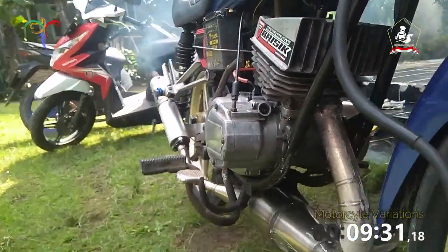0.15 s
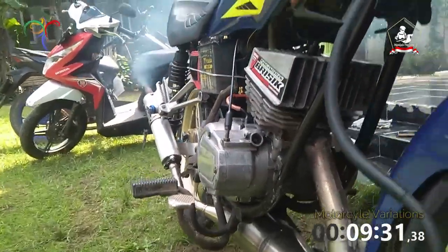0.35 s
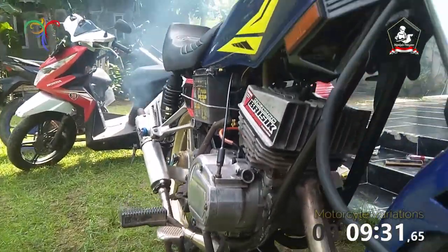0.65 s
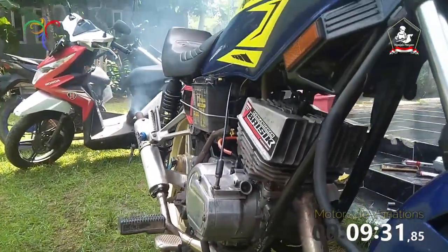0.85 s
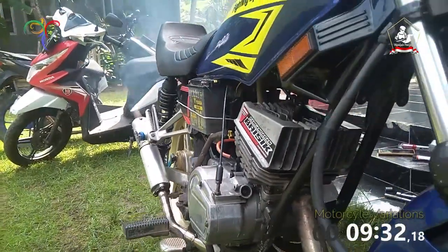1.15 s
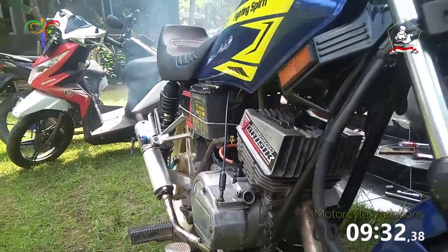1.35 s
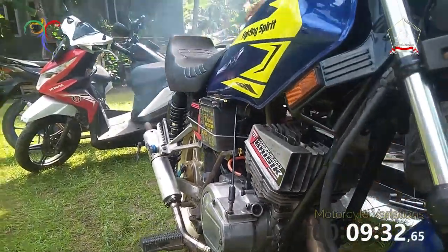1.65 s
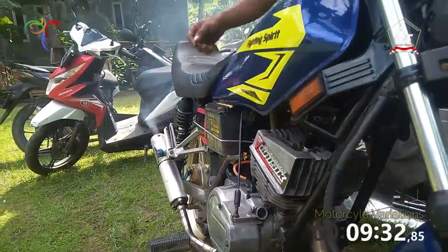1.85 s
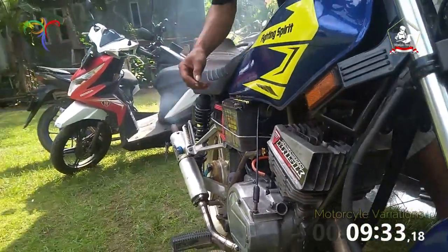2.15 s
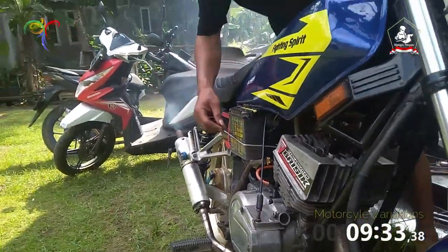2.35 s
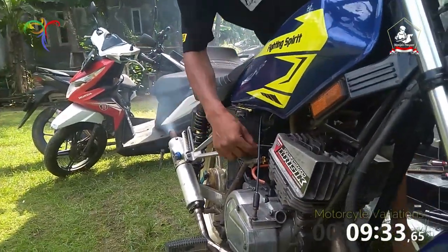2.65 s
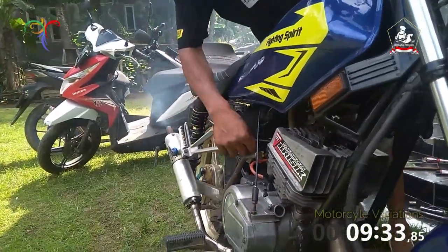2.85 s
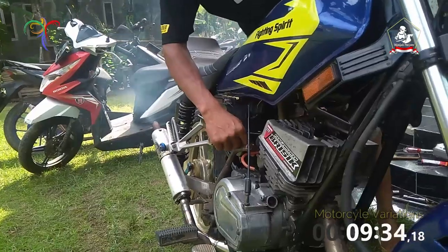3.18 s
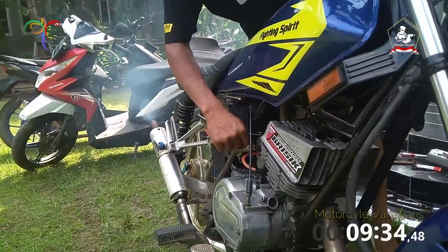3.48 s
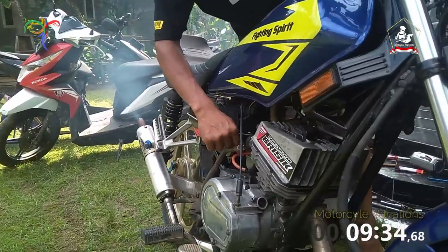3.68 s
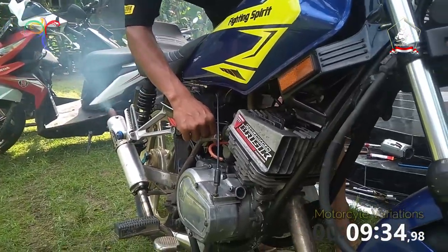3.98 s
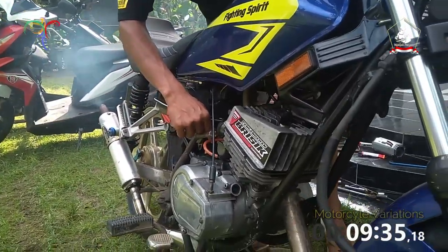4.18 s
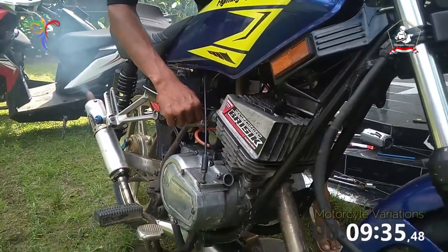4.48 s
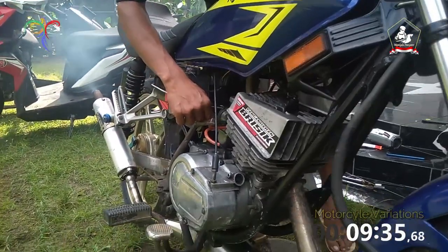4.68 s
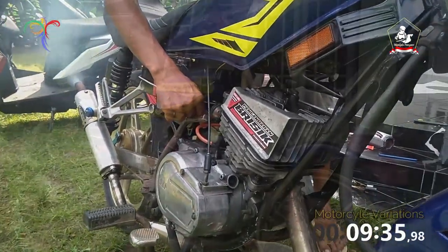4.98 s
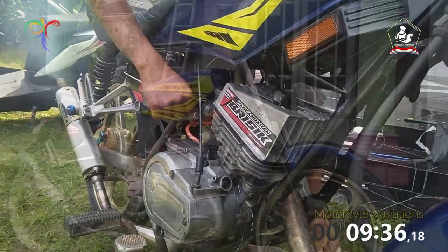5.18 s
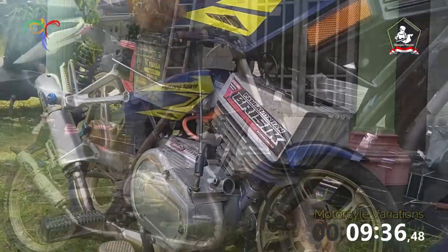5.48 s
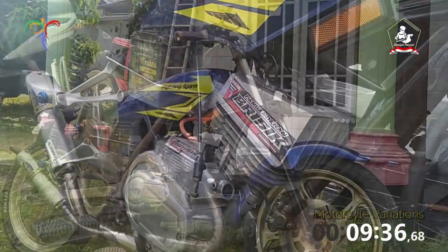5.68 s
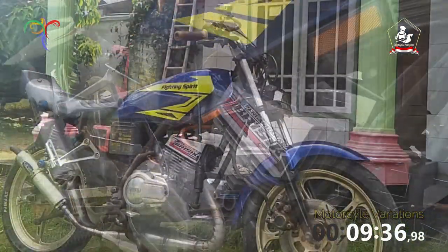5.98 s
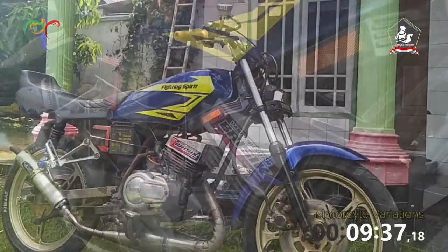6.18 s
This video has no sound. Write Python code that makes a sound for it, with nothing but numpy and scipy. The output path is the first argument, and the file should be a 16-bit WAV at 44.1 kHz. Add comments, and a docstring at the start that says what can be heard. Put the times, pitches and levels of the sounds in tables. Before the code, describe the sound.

A single-cylinder two-stroke motorcycle idles outdoors, close and slightly left. Quick soft puffs and dry piston slaps run continuously, while irregular firings add sharp snaps, low thumps, hollow silencer barks and bright steel pings. The idle sags for two seconds, then quickens and gets punchier around three to five seconds. Just after six seconds it suddenly becomes quieter and more distant.

```python
"""A single-cylinder two-stroke motorcycle idles on a lawn, close by and a little to the left.
From the start every turn of the crank puffs and slaps the piston against the ringing barrel; the turns that
fire, often every third or fourth, add a snap, a thump, a bark from the silencer and a ping of thin steel pipe.
The idle eases for two seconds, then quickens; the silencer speaks out briefly near 2.0 s and 3.6 s.
Just after 6 s the running sounds drop abruptly, as if heard from farther away."""
import sys
import numpy as np
from scipy import signal
from scipy.fft import rfft, irfft, next_fast_len
from scipy.io import wavfile
from scipy.ndimage import uniform_filter1d

SR = 44100
rng = np.random.default_rng(int(sys.argv[2]) if len(sys.argv) > 2 else 0)


def generate_wav(signal):
    """Clip the signal to [-1, 1] and save it as 16-bit WAV at the path in sys.argv[1]."""
    frames = np.transpose(np.atleast_2d(signal))
    scaled = np.clip(frames, -1, 1) * 32767
    pcm = np.round(scaled).astype(np.int16)
    wavfile.write(sys.argv[1], SR, pcm)


N = 279153

# turns that fire: (time [s], strength of the pressure front [dB], strength of the gas thump [dB])
FIRINGS = [(0.05, -16.5, -25), (0.2145, -12.5, -24), (0.4231, -11, -23.5), (0.626, -11.5, -24),
           (0.9624, -20, -26.5), (1.1231, -13.5, -25.5), (1.3367, -12.5, -29), (1.5414, -12, -27.5),
           (1.6937, -23, -31), (1.9846, -19, -29.5), (2.0984, -20, -32.5), (2.2112, -13, -30),
           (2.3604, -18.5, -30.5), (2.4613, -13.5, -22), (2.594, -15, -27.5), (2.6863, -20, -32.5),
           (2.784, -15, -24), (2.9235, -13.5, -27), (3.0593, -11, -20.5), (3.2247, -12, -25),
           (3.3966, -8, -22), (3.5603, -10.5, -22), (3.7252, -10.5, -23), (3.8958, -10.5, -20.5),
           (4.141, -15.5, -23), (4.312, -12, -23.5), (4.4842, -11, -23), (4.6417, -17.5, -30.5),
           (4.7257, -31.5, -29.5), (4.8134, -11.5, -23.5), (4.9806, -12.5, -24), (5.1015, -19.5, -27),
           (5.229, -12, -22.5), (5.3866, -15.5, -26), (5.5094, -24, -28), (5.5921, -17.5, -29),
           (5.7162, -21.5, -29), (5.8805, -25.5, -41), (5.965, -23.5, -42), (6.0269, -25, -33.5),
           (6.1424, -25, -37.5), (6.259, -28.5, -32.5), (6.3025, -18.5, -30)]
# loose metal chinks between firings: (time [s], relative level [dB])
CHINKS = [(0.357, -31), (0.545, -24), (0.719, -23), (0.779, -16), (0.838, -16.5), (1.215, -26.5),
          (1.274, -19.5), (1.8, -20.5), (1.857, -22), (2.532, -23.5), (2.662, -40), (2.86, -30),
          (3.299, -21.5), (3.465, -15.5), (3.502, -21.5), (3.626, -19.5), (3.828, -23.5), (3.96, -17.5),
          (4.376, -28), (4.549, -19.5), (4.876, -12.5), (5.304, -24.5)]
# crank speed: (time [s], speed [turns per second])
CRANK_SPEED = [(0, 19.4), (2, 18.6), (3.1, 22.4), (6.3, 24.2)]
# hard piston slaps: (time at their height [s], relative level [dB], centre of the ring [Hz])
HARD_SLAPS = [(0.045, -30, 2170), (0.093, -32.5, 1990), (.142, -33.5, 1300), (0.208, -29.5, 2000),
              (0.296, -31.5, 1700), (.419, -23.5, 2020), (.46, -28, 1580), (.499, -27.5, 1470),
              (.615, -31.5, 1780), (0.661, -29, 1760), (0.772, -33.5, 1740), (.888, -32.5, 1860),
              (.962, -28.5, 1420), (0.999, -27.5, 1760), (1.121, -34.5, 1870), (1.159, -30.5, 1370),
              (1.371, -25.5, 1440), (1.576, -33, 1370), (1.628, -33, 1660), (1.693, -29.5, 1750),
              (2.145, -31, 1370), (2.353, -32, 2260), (2.457, -31.5, 1170), (2.492, -32.5, 1490),
              (2.536, -28.5, 1520), (2.585, -30.5, 1820), (2.687, -28, 1420), (2.783, -24, 1410),
              (2.814, -31, 1170), (2.868, -31.5, 1500), (2.917, -28.5, 1690), (2.952, -30, 1150),
              (2.997, -30.5, 1120), (3.057, -35, 1300), (3.086, -21, 1120), (3.165, -32, 1190),
              (3.222, -30, 1480), (3.392, -24.5, 1430), (3.432, -26, 1200), (3.464, -29, 1600),
              (3.558, -30, 1700), (3.588, -27.5, 1120), (3.623, -30, 1150), (3.666, -30, 1150),
              (3.726, -30.5, 1410), (3.888, -29, 1120), (3.924, -32, 1600), (3.958, -28, 1280),
              (4.084, -35, 1100), (4.138, -28.5, 2080), (4.169, -32, 1250), (4.206, -28, 1190),
              (4.311, -30.5, 1350), (4.483, -26, 1850), (4.513, -29.5, 1220), (4.549, -29.5, 1650),
              (4.638, -31.5, 1900), (4.726, -31, 2010), (4.808, -26.5, 2050), (5.099, -31, 1700),
              (5.228, -30, 1520), (5.384, -26, 2020), (5.414, -27, 2060), (5.51, -27.5, 2150),
              (5.541, -29, 1950), (5.591, -31, 1950), (5.623, -32, 1980), (5.714, -29, 2200),
              (5.742, -27.5, 1290), (5.96, -31.5, 2200), (6.304, -32, 1370)]
# moments when the silencer's main resonance speaks out: (time [s], relative level [dB])
HONKS = [(2.01, -31.5), (3.645, -23)]
# rising overtones of the pipe after a burn: (delay after the thump [s], pitch [Hz], level against the thump [dB])
WHOOPS = [(0.01691, 248, -14), (0.033, 372, -20.5), (0.01417, 530, -21), (.006, 777, -19)]

# resonances of the silencer: (frequency [Hz], width [Hz], relative level [dB])
SILENCER_RESONANCES = [(255.3, 9.4, -1.5), (396, 13, -6.5), (510.7, 14, 1.5), (633, 31.5, 9),
                       (706, 264, -3.5), (892, 10, -1), (1140, 110, -2), (1260, 40, -1.5)]
# thin tones that ring out as lines with each firing: (frequency [Hz], relative level [dB], time to fall 60 dB
# [s])
STEEL_TONES = [(5148, -3, 0.3), (6530, -4, 0.3), (7290, -1, 0.3), (8666, 2, 0.3), (9265, 8, 0.3),
               (9747, 6, 0.25), (10447, 5, 0.2), (10790, 5, 0.25)]
# tones of the finned barrel: (frequency [Hz], relative level [dB])
BARREL_TONES = [(1090, 3.5), (1165, 5), (1265, 0), (1450, -12), (1780, -3), (1890, -8.5), (2000, -4),
                (2085, -5.5), (2280, -6.5), (2450, -9.5), (2840, -1), (3250, -5.5)]

# colour of the pipe's bright ringing: (frequency [Hz], relative level [dB])
PING_COLOUR = [(3000, -59), (7000, -44), (8500, -1), (9600, 10), (10600, 8), (11500, 1.5), (13500, -2.5),
               (15700, -7.5)]
# colour of the pipe's lower ringing: (frequency [Hz], relative level [dB])
RING_COLOUR = [(1500, -14.5), (3200, -11), (3900, -14.5), (4650, -23), (5200, 0), (5800, -5), (7000, 2),
               (8200, -1.5), (9100, 4.5), (10500, -24), (13000, -28), (16000, -36)]
# colour of the gas rushing through the silencer: (frequency [Hz], relative level [dB])
BARK_COLOUR = [(40, 1), (120, 16.5), (220, -2.5), (350, 0), (700, -6.5), (1200, -8), (1700, -15),
               (3000, -7.5), (4500, -72)]
# colour of the tiny contacts in a piston slap: (frequency [Hz], relative level [dB])
RATTLE_COLOUR = [(300, -43), (800, -1.5), (1150, 4), (1500, 6.5), (1900, -4.5), (2450, 1), (3000, 3),
                 (3450, 1), (3750, -8.5), (4600, -7), (5500, -47), (9000, -4), (12000, -11)]
# colour of gears, intake and yard: (frequency [Hz], relative level [dB])
WHIRR_COLOUR = [(15, -22), (25, -14), (40, 3.5), (75, -3), (130, 3.5), (340, -7.5), (500, -5), (640, 0),
                (850, -5), (1200, -12), (1600, -13.5), (2800, -13.5), (4200, -25.5), (5300, -53),
                (9000, -23), (15500, -39)]
# colour of the pressure front's snap: (frequency [Hz], relative level [dB])
CRACK_COLOUR = [(400, -15), (1000, 16), (3000, -8.5), (4200, -4), (7000, -7.5), (15000, -15.5)]
# how alike left and right are: (frequency [Hz], likeness [0 to 1])
LEFT_RIGHT_LIKENESS = [(100, 0.88), (300, 0.92), (600, 0.79), (1200, 0.31), (2500, 0.61), (5000, 0.025),
                       (12000, 0.03)]

SLOW_IDLE = 17.9  # turns per second
DROP_FROM_S, DROP_TO_S = 6.01, 6.06  # the running sounds drop abruptly
# running sounds: (level at slow idle [dB], change per extra turn a second [dB], loss in the drop [dB])
PUFF_RUNNING = (-26.5, -0.81, 10)
WAFT_RUNNING = (-42, 0.25, 15)
SLAP_RUNNING = (-35.5, 0.23, 5.4)
TICK_RUNNING = (-35.5, 0.45, 5.4)
GEARS_RUNNING = (-40.5, 0.21, 3.4)

USUAL_CRACK_DB, USUAL_THUMP_DB = -12, -25.5  # strengths of an average firing
# what a firing excites: (level for an average firing [dB], growth [dB per dB of extra strength])
PING_LAW = (-22, 0.81)
RING_LAW = (-33, 0.9)
SLAP_LAW = (-35.5, 0.19)
CRACK_LAW = (-22, 0.5)
THUMP_LAW = (-20, 1.4)
GUST_LAW = (-32, 1)

COAST_DB_PER_S = 8  # light slaps soften while the crank coasts
SLAP_LEAD_FIRED_S, SLAP_LEAD_COASTING_S = 0.00412, 0.016  # slap before top dead centre, at slow idle
LEAD_SHRINK = 0.13  # per extra turn a second
SAME_SLAP_S = .018  # a light slap this near a hard one is left out
LIGHT_SLAP_HZ = 1650
SLAP_RISE_S, SLAP_SHARPNESS = .013, 2.47  # swelling time; a higher sharpness shortens the slap
SLAP_SPREAD = .17  # how far tones ring around a slap's pitch, as a log of frequency ratio
# a glide is half the relative rise in pitch per second
SLAP_GLIDE, PUFF_GLIDE, WHOOP_GLIDE = 2.2, 6, 5.6
WHOOP_WIDTH_S = 0.0074  # spread of the bell-shaped swell
HONK_HZ = 624
RATTLE_DB = -6.5
STRIKE_RISE_S = .008  # time to climb 60 dB
STEEL_PATCHY_DB, FLUTTER_DB = 5.5, 1.3  # random unevenness
TOP_HZ = 15800


def amp(db):
    """Turn decibels into a gain."""
    return 10 ** (np.asarray(db) / 20)


def unit(x):
    """Scale a signal to an average strength (rms) of 1."""
    return x / np.sqrt(np.mean(x ** 2) + 1e-20)


def along(points, hz):
    """Read a curve of (frequency, value) points on a log frequency axis."""
    f, v = np.transpose(points)
    return np.interp(np.log(hz + 1), np.log(f + 1), v)


def at(rows, s, axis):
    """Read one column of a curve at the times s."""
    rows = np.asarray(rows)
    return np.interp(s, rows[:, 0], rows[:, axis])


def filtered(x, response):
    """Shape a sound by a gain that depends on frequency."""
    n = x.shape[-1]
    m = next_fast_len(n + 8192)
    return irfft(rfft(x, m) * response(np.fft.rfftfreq(m, 1 / SR)), m)[..., :n]


def noise(colour, size):
    """Make coloured stereo noise of rms 1, whose two sides are more alike in the bass."""
    def response(hz):
        turn = np.arccos(np.clip(along(LEFT_RIGHT_LIKENESS, hz), -1, 1)) / 2
        return amp(along(colour, hz)) * [np.cos(turn), np.sin(turn)]
    mid, side = filtered(rng.standard_normal((2, size)), response)
    return unit(np.array([mid + side, mid - side]))


def sizzle(colour, patchy_db):
    """Make noise of rms 1 from crowded resonances that swell and fade at random."""
    z = signal.stft(noise(colour, N), nperseg=512)[2]
    field = uniform_filter1d(rng.standard_normal(z.shape[1:]), size=3, axis=0)
    field = uniform_filter1d(field, size=9, axis=1)
    patches = amp(patchy_db * np.clip(unit(field), -3, 1.6))
    return unit(signal.istft(z * patches, nperseg=512)[1][:, :N])


def slow_random(size):
    """Make a smoothed random curve of rms 1."""
    return unit(uniform_filter1d(rng.standard_normal(N), size=size))


def pan(left_db):
    """Give the gains of two channels, the left louder by left_db."""
    return amp([[left_db / 2], [-left_db / 2]])


def add(track, s, sound):
    """Mix a sound into a track from time s."""
    start = int(round(s * SR))
    lo, hi = max(start, 0), min(start + sound.shape[-1], N)
    if hi > lo:
        track[..., lo:hi] += sound[..., lo - start:hi - start]


def bursts(times, db, rise, t60):
    """Make an envelope that climbs 60 dB in rise seconds to each time and falls 60 dB in t60 seconds."""
    t = np.arange(-SR // 20, SR // 3) / SR
    shape = amp(60 * np.where(t < 0, t / rise, -t / t60))
    power = np.zeros(N)
    for s, level in zip(times, db):
        add(power, s + t[0], (amp(level) * shape) ** 2)
    return np.sqrt(power)


def gulp(t, hz, glide, width):
    """Make a few cycles of gas in the exhaust, rising in pitch around t = 0."""
    swell = np.exp(-.5 * (t / width) ** 2)
    return swell * np.cos(2 * np.pi * hz * (t + glide * t * t))


def crank_turns(slowing=0.0406):
    """List when the piston is at the top and whether it fires; the crank slows while it coasts."""
    before = FIRINGS[0][0] - 2 / CRANK_SPEED[0][1]
    after = FIRINGS[-1][0] + 1 / CRANK_SPEED[-1][1]
    fired = np.r_[before, np.array(FIRINGS)[:, 0], after]
    turns = []
    for a, b in zip(fired, fired[1:]):
        count = max(1, round((b - a) * at(CRANK_SPEED, a, axis=1)))
        u = np.arange(count) / count
        turns += zip(a + (b - a) * (u - slowing * u * (1 - u)), u == 0)
    return turns


def running(law, s):
    """Give the level in dB of a running sound from crank speed and the late drop."""
    idle_db, db_per_turn, lost_db = law
    dropped = np.clip((s - DROP_FROM_S) / (DROP_TO_S - DROP_FROM_S), 0, 1)
    return idle_db + db_per_turn * (at(CRANK_SPEED, s, axis=1) - SLOW_IDLE) - lost_db * dropped


def by_crack(law):
    """Give each firing's level in dB for a sound driven by its pressure front."""
    usual_db, growth = law
    return usual_db + growth * (np.array(FIRINGS)[:, 1] - USUAL_CRACK_DB)


def by_thump(law):
    """Give each firing's level in dB for a sound driven by its gas."""
    usual_db, growth = law
    return usual_db + growth * (np.array(FIRINGS)[:, 2] - USUAL_THUMP_DB)


def whirr():
    """Fill the gaps between beats with patchy noise for gears, intake and the yard's echo."""
    level = amp(running(GEARS_RUNNING, np.arange(N) / SR))
    return sizzle(WHIRR_COLOUR, patchy_db=6) * level * pan(7.2)


def slaps(turns):
    """List (time, dB, Hz) of the hard slaps, and of light ones that soften while the crank coasts."""
    s, fires = np.transpose(turns)
    level, pitch, lag = rng.standard_normal((len(s), 3)).T * [[1.2], [.22], [.0015]]
    coasting = s - np.maximum.accumulate(s * fires)  # seconds since the last firing
    firing_db = np.interp(s, np.array(FIRINGS)[:, 0], by_crack(SLAP_LAW))
    idle_db = running(SLAP_RUNNING, s) - COAST_DB_PER_S * coasting
    lead = np.where(fires, SLAP_LEAD_FIRED_S, SLAP_LEAD_COASTING_S)
    lead = lead * np.exp(-LEAD_SHRINK * (at(CRANK_SPEED, s, axis=1) - SLOW_IDLE))
    light_db = np.where(fires, firing_db, idle_db) + level
    light = np.transpose([s + lag - lead, light_db, LIGHT_SLAP_HZ * np.exp(pitch)])
    free = np.abs(light[:, :1] - np.array(HARD_SLAPS)[:, 0]).min(axis=1) > SAME_SLAP_S
    return np.vstack([HARD_SLAPS, light[free]])


def piston(turns, ring_db=-2.5, upper_db=-7, upper_ratio=1.614):
    """Let each slap ring the barrel around its own pitch and a higher one, over a rattle of tiny contacts."""
    fins, force, t = np.zeros((2, N)), np.zeros(N), np.arange(SR // 14) / SR
    shape = (t / SLAP_RISE_S * np.exp(1 - t / SLAP_RISE_S)) ** SLAP_SHARPNESS
    bent_time = t + SLAP_GLIDE * (t - SLAP_RISE_S) ** 2  # bends the ring upward
    tone_hz, tone_db = np.transpose(BARREL_TONES)

    def near(hz):
        return np.exp(-.5 * (np.log(tone_hz / hz) / SLAP_SPREAD) ** 2)

    for s, db, hz in slaps(turns):
        level, detune, phase, skew = rng.standard_normal((4, len(BARREL_TONES))) * [[5], [.03], [9], [.6]]
        weight = amp(tone_db + level) * (near(hz) + amp(upper_db) * near(hz * upper_ratio))
        tones = np.exp(2j * np.pi * np.outer(tone_hz * (1 + detune), bent_time))
        sides = np.exp(1j * np.array([phase + skew, phase - skew]))  # left and right differ in phase
        ring = shape * np.real(weight * sides @ tones)
        add(fins, s - SLAP_RISE_S, amp(db) * unit(ring) * np.sqrt(np.mean(shape ** 2)))
        add(force, s - SLAP_RISE_S, amp(db) * shape)
    grain = unit(amp(2.0 * slow_random(30)))
    rattle = amp(RATTLE_DB) * sizzle(RATTLE_COLOUR, STEEL_PATCHY_DB) * grain * force
    return amp(ring_db) * fins * pan(4.2) + rattle * pan(7.0)


def pipe_wall(colour, t60):
    """Make the dense ringing of thin steel as fading noise, with an average energy of 1 per channel."""
    t = np.arange(SR // 4) / SR
    return unit(noise(colour, len(t)) * amp(-60 * t / t60)) / np.sqrt(len(t))


def strike(envelope, wall):
    """Shake a ringing wall with random force that follows an envelope."""
    force = rng.standard_normal((1, N)) * envelope
    return signal.fftconvolve(force, wall, axes=1)[:, :N]


def ping(turns):
    """Let each firing's pressure front strike the steel pipe; every turn and chink shakes it too."""
    s, ping_db, ring_db = np.array(FIRINGS)[:, 0], by_crack(PING_LAW), by_crack(RING_LAW)
    chink_s, chink_db = np.transpose(CHINKS)
    turn_s = np.array(turns)[:, 0]
    # the bright part flashes up and dies fast
    front = bursts(s, ping_db, rise=STRIKE_RISE_S, t60=0.033)
    flash = bursts(s - .0005, ping_db + 0.5, rise=STRIKE_RISE_S, t60=0.1)
    tail = bursts(s, ping_db - 2.0, rise=STRIKE_RISE_S, t60=0.17)
    chinks = bursts(chink_s + 0.0012, chink_db - 18.0, rise=STRIKE_RISE_S, t60=0.21)
    bright = strike(front * amp(7.0), pipe_wall(PING_COLOUR, t60=0.23))
    bright = bright + sizzle(PING_COLOUR, STEEL_PATCHY_DB) * np.sqrt(flash ** 2 + tail ** 2 + chinks ** 2)
    # the lower part ticks with every turn
    shake = bursts(s, ring_db, rise=STRIKE_RISE_S, t60=0.11)
    tick_db = running(TICK_RUNNING, turn_s) + 1.5 * rng.standard_normal(len(turn_s))
    ticks = bursts(turn_s - .004, tick_db, rise=0.013, t60=0.052)
    scrape = bursts(s - .0005, ring_db + 0.5, rise=STRIKE_RISE_S, t60=0.081)
    clacks = bursts(chink_s + 0.0012, chink_db - 6, rise=.004, t60=0.065)
    contacts = np.sqrt(ticks ** 2 + scrape ** 2 + clacks ** 2)
    body = strike(shake * amp(10.5) + contacts * amp(-3.0), pipe_wall(RING_COLOUR, t60=.24))
    body = body + sizzle(RING_COLOUR, STEEL_PATCHY_DB) * contacts
    # the clearest tones stand out as lines
    t = np.arange(SR // 3) / SR
    tones = np.zeros((2, len(t)))
    for hz, db, t60 in STEEL_TONES:
        tones += amp(db - 60 * t / t60) * np.sin(2 * np.pi * (hz * t + rng.random((2, 1))))
    lines = strike(front * amp(-4.0), unit(tones) / np.sqrt(len(t)))
    flutter = amp(FLUTTER_DB * slow_random(300))
    return flutter * (bright * pan(10.8) + body * pan(1.9) + lines * pan(5.3))


def crack():
    """Let each firing's pressure front leave the pipe as one short, broad snap."""
    envelope = bursts(np.array(FIRINGS)[:, 0] - .001, by_crack(CRACK_LAW), rise=0.0037, t60=0.014)
    return noise(CRACK_COLOUR, N) * envelope * pan(3.9)


def silencer(hz):
    """Give the silencer's response: a sum of resonances with alternating signs."""
    total = 0
    for k, (centre, width, db) in enumerate(SILENCER_RESONANCES):
        damping = 1j * hz * width
        total = total + (-1) ** k * amp(db) * damping / (centre * centre - hz * hz + damping)
    return total


def bark(turns):
    """Blow a crackling gust through the silencer at each firing, and a soft waft at every turn."""
    fire_s, turn_s = np.array(FIRINGS)[:, 0], np.array(turns)[:, 0]
    eddies = unit(amp(2.76 * slow_random(40)))
    gust = noise(BARK_COLOUR, N) * eddies * bursts(fire_s + 0.0043, by_thump(GUST_LAW), rise=0.017, t60=0.19)
    waft_db = running(WAFT_RUNNING, turn_s)
    waft = noise(BARK_COLOUR, N) * bursts(turn_s - .008, waft_db, rise=0.035, t60=0.17)
    honks, t = np.zeros(N), np.arange(-SR // 30, SR // 30) / SR
    for s, db in HONKS:
        add(honks, s + t[0], amp(db) * gulp(t, HONK_HZ, glide=0.78, width=0.0094))
    return (gust + amp(11.0) * filtered(gust + waft, silencer) + honks) * pan(5.9)


def outlet(hz):
    """Weaken the deep bass, which a small outlet radiates poorly."""
    return hz / np.hypot(hz, 45)


def exhaust(turns):
    """Puff softly with unburnt gas; thump harder with hot gas, which leaves rising whoops in the pipe."""
    out, t = np.zeros(N), np.arange(-SR // 20, SR // 12) / SR
    for s, fires in turns:
        if fires:
            continue
        level, pitch, lag = rng.standard_normal(3) * [1.1, .03, .001]
        puff = gulp(t, hz=114 * np.exp(pitch), glide=PUFF_GLIDE, width=0.0062)
        puff = puff + amp(-24.0) * gulp(t - .022, hz=203, glide=17.0, width=0.0046)
        add(out, s + t[0] + 0.0112 + lag, amp(running(PUFF_RUNNING, s) + level) * puff)
    for (s, _, _), thump_db in zip(FIRINGS, by_thump(THUMP_LAW)):
        heat = np.clip((thump_db + 32.0) / 12, 0, 1)  # a stronger burn is shorter and higher
        thump_hz = (118 + 34 * heat) * np.exp(.025 * rng.standard_normal())
        thump = gulp(t, hz=thump_hz, glide=4.2, width=.009 - 0.0049 * heat)
        for after, hz, db in WHOOPS:
            level, pitch, lag = rng.standard_normal(3) * [2.5, .08, .003]
            whoop = gulp(t - after - lag, hz * np.exp(pitch), WHOOP_GLIDE, WHOOP_WIDTH_S)
            thump = thump + amp(db + level) * whoop
        add(out, s + t[0] + 0.01036, amp(thump_db) * thump)
    return filtered(out, outlet) * pan(5.9)


def scene():
    """Add all the sounds of the idling engine."""
    turns = crank_turns()
    return whirr() + piston(turns) + ping(turns) + crack() + bark(turns) + exhaust(turns)


def record(dry):
    """Round off the loudest peaks and keep nothing above the band limit."""
    rounded = dry / (1 + np.abs(dry / .85) ** 6) ** (1 / 6)
    return filtered(rounded, lambda hz: hz < TOP_HZ)


dry = scene()
out = record(dry)
generate_wav(out)
```